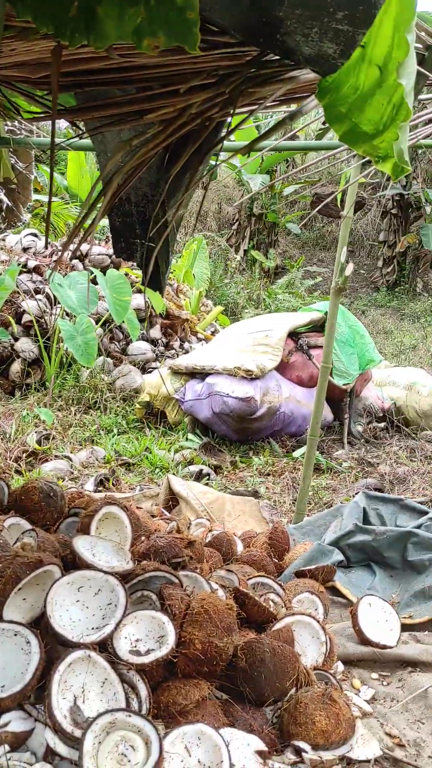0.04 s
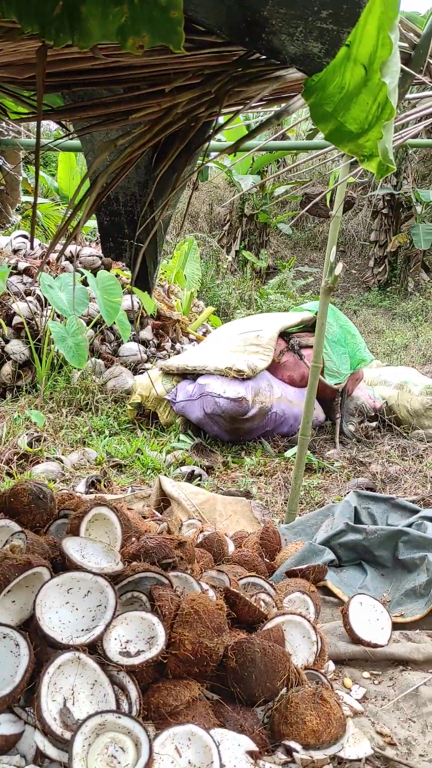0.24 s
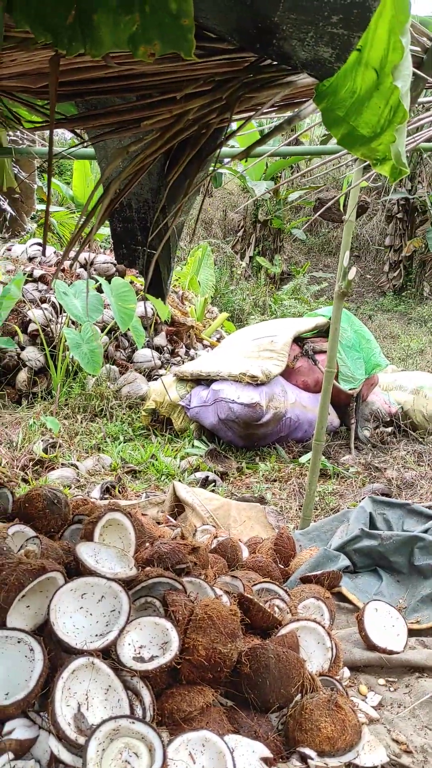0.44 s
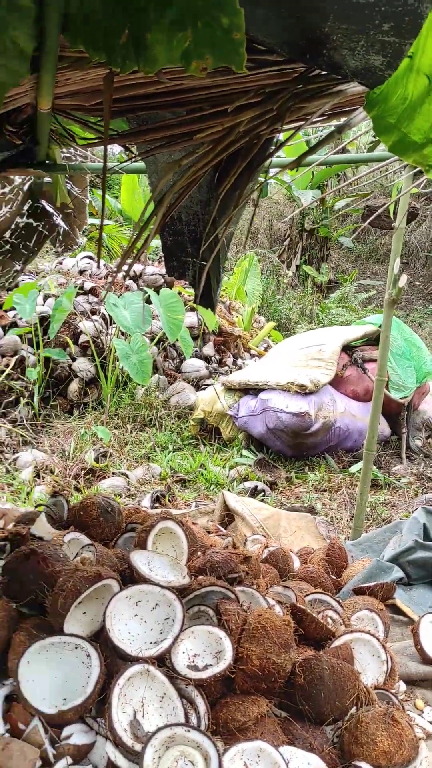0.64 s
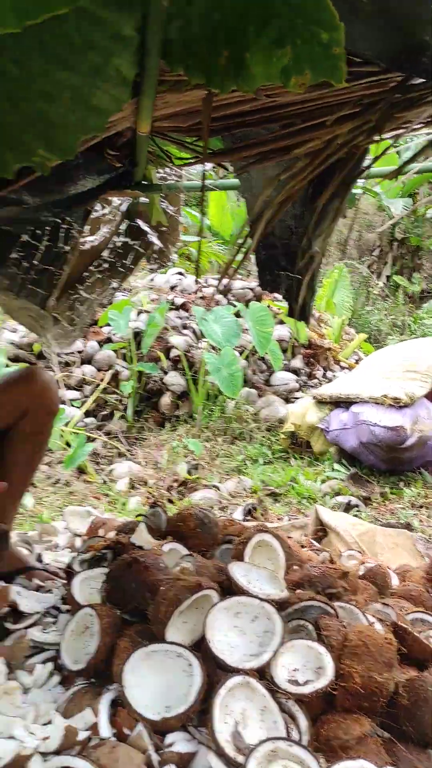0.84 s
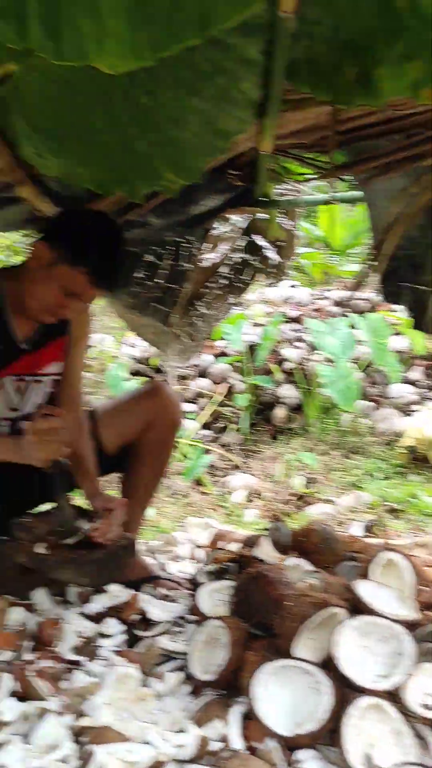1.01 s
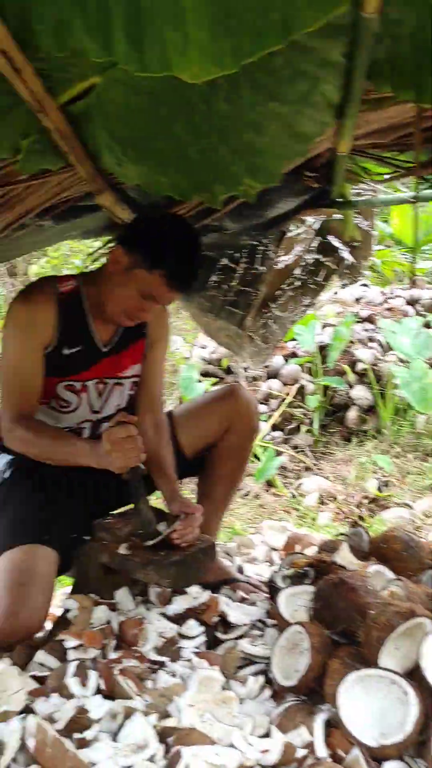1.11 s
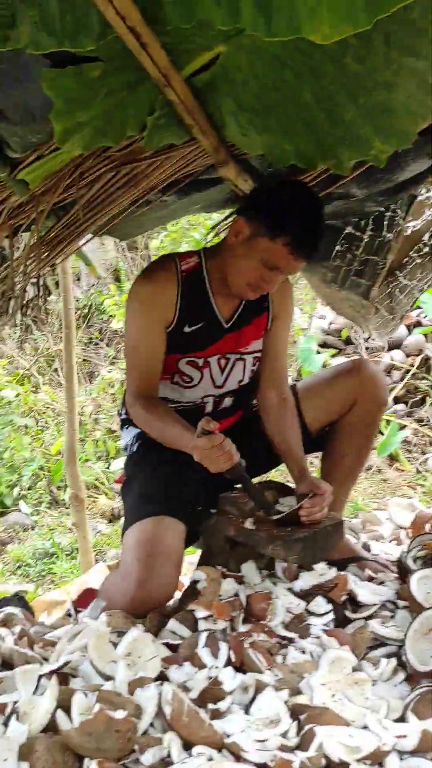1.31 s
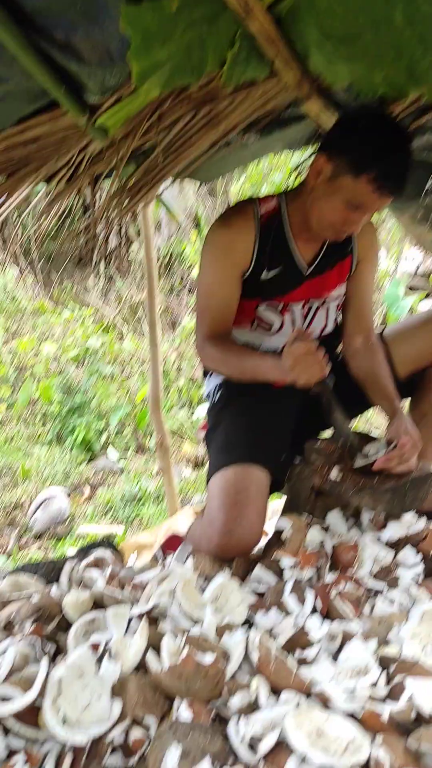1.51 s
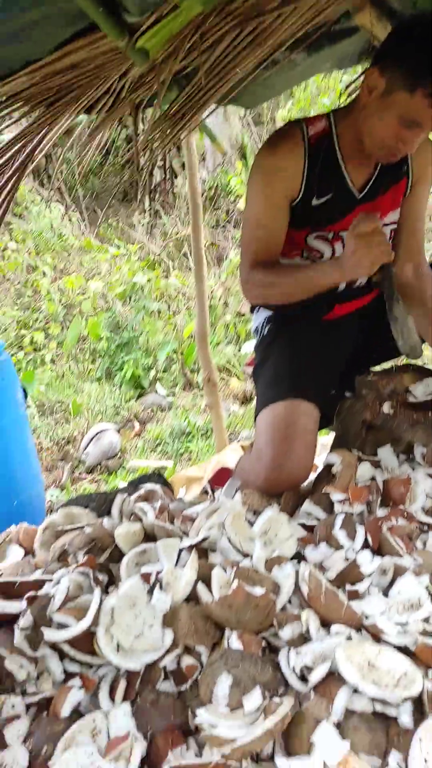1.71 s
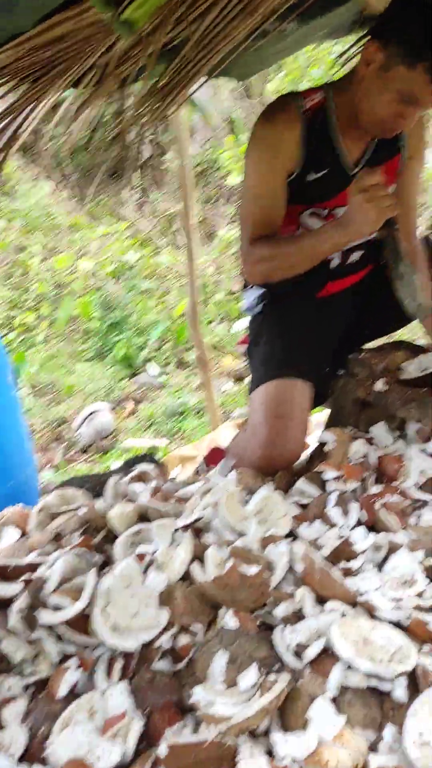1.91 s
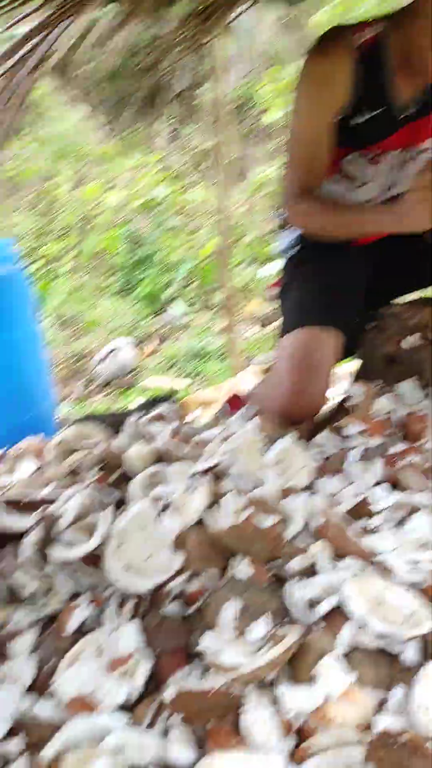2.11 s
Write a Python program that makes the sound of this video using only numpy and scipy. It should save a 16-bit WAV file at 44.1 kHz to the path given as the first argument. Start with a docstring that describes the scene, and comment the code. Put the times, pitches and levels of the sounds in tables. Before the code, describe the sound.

Coconut shell cracks under a large knife on a wooden block, loudly once and then again. After a short pause come smaller crackles, taps and blade scrapes, heard nearby outdoors over quiet hiss and slight wind.

```python
"""Under a leaf roof in a garden, a heavy knife knocks, cracks and scrapes coconut shells on a wooden block.
Each knock rings shell and block; each crack is a bright burst of splitting fibre. The blade grates
between them over quiet hiss and wind. Sound scatters off the heap of shells, and a phone with two
unlike, resonant microphone ports listens."""
import sys
import numpy as np
from scipy import signal
from scipy.fft import rfft, irfft, next_fast_len
from scipy.io import wavfile
from scipy.ndimage import uniform_filter1d

SR = 44100
rng = np.random.default_rng(int(sys.argv[2]) if len(sys.argv) > 2 else 0)


def output_pcm(signal):
    """Save a mono or channel-first signal as 16-bit PCM at the path in sys.argv[1].

    Samples are clipped to [-1, 1] before scaling.
    """
    pcm = np.clip(np.atleast_2d(signal).T, -1, 1) * 32767
    wavfile.write(sys.argv[1], SR, np.round(pcm).astype(np.int16))


N = 94815

# Shell modes. Each row: multiple of the piece's pitch, level in dB, t60 in seconds.
SHELL_MODES = [(.73, -7, 0.026), (1.01, 3.5, 0.022), (1.21, -5.5, 0.016), (1.45, -9, 0.02),
               (1.8, -4.5, 0.016), (2.15, -15, 0.025), (2.6, -14, 0.011), (3.7, -24.5, 0.01)]
# Block modes. Each row: frequency in Hz, level in dB, t60 in seconds.
BLOCK_MODES = [(74, -19, .05), (169, -15, 0.009), (248.2, -1.5, .045), (398.7, 2.5, 0.037),
               (487.3, 0, 0.045), (549, 0.5, 0.037)]
# Spectrum of splitting fibre. Each row: frequency in Hz, relative level in dB.
FIBRE_SPECTRUM = [(880, -35.5), (1500, -8.5), (2150, -9), (3500, -15.5), (4010, -10.5), (4390, -12.5),
                  (6110, -5), (7100, -4), (8500, -7.5), (9890, -19), (10700, -28.5), (15500, -30.5),
                  (16500, -44)]
SHELL_BLOOM_CYCLES, BLOCK_BLOOM_CYCLES = 1, 1.2


def knocks():
    """Blade on shell, shell on block; block modes far from the struck spot's pitch are weaker."""
    # Each row: start in seconds, shell peak in dB, shell pitch in Hz, thud relative to shell in dB,
    # pitch of the struck spot in Hz, ring length factor, shell overtone slope in dB per octave.
    blows = [(.067,-60,970,11,333,0.61,-3),(.104,-44,1430,-10,406,0.52,-1),(0.112,-38.5,1513,-28,369,1.3,-6),(0.137,-33.5,1370,-11,448,0.77,-1.5),
             (0.204,-32.5,1120,-10,560,0.39,-13),(0.2093,-6.5,1174,-5.5,565,0.49,-0.5),(0.2125,-10,828,-2.5,395,0.48,-17),
             (0.282,-58.5,1122,11,275,0.8,-5.5),(.3352,-34,1153,-17.5,600,0.84,-12),(0.3362,-36,1436,-22,596,0.74,-18.5),(0.428,-42,1260,-22,403,0.71,3),(0.4584,-15,1287,-20.5,473,0.44,-2),(.4608,-17,989,-13,520,0.57,2),(0.4629,-23.5,730,-2.5,515,0.3,-12),
             (.489,-31.5,1196,-4,448.4,0.66,-1),(0.949,-51.5,1137,-11,512,0.83,2.5),(1.0932,-21.5,1410,-12,257,0.57,5),(1.0989,-35.5,1330,8,240,0.21,-5),
             (1.1121,-17,1006,-17,310,0.56,7.5),(1.1202,-35,776,-15,303,0.56,-3),(1.1268,-23,870,-14.5,345,0.6,3.5),(1.1424,-27.5,1026,-30,301,0.89,1),(1.147,-29,809,-22,490,1.7,-4),
             (1.155,-29.5,893,-12.5,200,0.39,7),(1.257,-32,1406,-41,500,0.77,-3),(1.277,-32,870,-22,493,1.1,12),
             (1.316,-34,890,-35,496,1.9,6.5),(1.336,-28.5,835,-12,410,0.7,7),
             (1.376,-23.5,817,-8.5,384,0.83,-2.5),(1.386,-29.5,803,-8,225,0.52,-5),(1.401,-36.5,762,-20,396,2,-17),(1.439,-39,1244,-12.5,390,1.6,0.5),
             (1.481,-38.5,782,-11,229,1,7.5),(1.539,-34,814,-15,213,1.06,-8),(1.623,-40.5,830,3.5,313,0.48,-8),
             (1.645,-33,820,-4.5,284,0.44,2.5),(1.698,-52,1810,-1,202,0.35,-3),(1.764,-45.5,880,-6,75,0.82,-18)]
    out = np.zeros(N)
    for start_s, db, hz, thud_db, spot_hz, stretch, octave_db in blows:
        shell = ring(SHELL_MODES, SHELL_BLOOM_CYCLES, stretch, pitch=hz, focus_hz=hz, octave_db=octave_db)
        thud = ring(BLOCK_MODES, BLOCK_BLOOM_CYCLES, stretch, focus_hz=spot_hz, octave_db=-15)
        add(out, start_s, amp(db) * (shell + amp(thud_db) * thud))
    return out


def cracks():
    """Splitting fibre: fast-rising bright noise bursts, each with a resonant bite at its own pitch."""
    # Each row: start in seconds, level in dB before trim, rise in seconds, t60 in seconds,
    # relative bite level in dB, bite pitch in Hz.
    splits = [(0.107,-36,0.00062,0.068,-26,2800),(0.133,-33.5,0.0029,0.086,-10,2400),(0.2027,-21,0.0011,0.022,-21,2800),(0.205,-8.5,0.0023,0.052,-20.5,2200),
              (0.3595,-39.5,0.0028,0.04,-14,7000),(0.426,-39,0.0014,0.038,-12,3940),(0.4566,-17,0.0024,0.037,-4.5,4340),
              (0.5205,-36,0.003,0.025,-13,7050),(1.085,-23.5,0.0045,0.034,-16,2600),(1.0897,-18,0.0048,0.037,-7.5,2200),
              (1.1224,-33,0.0024,0.029,-4,2500),(1.1347,-21.5,0.0013,0.047,-18,1980),(1.1474,-41,0.0033,0.081,-6,2200),(1.26,-32.5,0.0029,0.09,-4,1360),
              (1.331,-40,0.00091,.025,0,4400),(1.3647,-25,0.00081,0.057,-7.5,6800),(1.379,-33,0.0026,0.052,-20,4430),(1.3934,-28.5,0.0019,0.021,-18,4500),(1.436,-40,0.0011,0.033,-18,2800),
              (1.527,-36.5,0.0042,0.07,-18,2740),(1.619,-32,.002,0.036,-29,2830),(1.6373,-34.5,0.0058,0.055,-1.5,2650),
              (1.6965,-32.5,0.00093,0.047,-25,2280),(1.7557,-31,0.0022,0.063,-6.5,4400)]
    trim_db, tilt_db_per_octave, bite_bandwidth_ratio = -6.5, 2.5, 0.3
    t, out = np.arange(5000) / SR, np.zeros((2, N))
    white = rng.standard_normal((3, N))
    noise = patchy(white[:2] + 0.28 * white[2])  # small part common to both ports
    wide = evened(colour(noise, lambda hz: amp(
        read(FIBRE_SPECTRUM, hz) + tilt_db_per_octave * np.log2(hz + 1))))
    for start_s, db, rise_s, t60_s, bite_db, bite_hz in splits:
        span = slice(round(start_s * SR), round(start_s * SR) + len(t))
        attack = np.minimum(t / rise_s, 1) ** 2
        decay = amp(db + trim_db - 60 * np.maximum(t - rise_s, 0) / t60_s)
        resonator = signal.iirpeak(bite_hz, 1 / bite_bandwidth_ratio, SR)
        bite = evened(signal.lfilter(*resonator, signal.lfilter(*resonator, noise[:, span])))
        add(out, start_s, attack * decay * (wide[:, span] + amp(bite_db) * bite))
    return out


def high_ring():
    """A brief high ring near 7 and 9 kHz on the hardest blow."""
    # Each row: frequency in Hz, level in dB, t60 in seconds.
    high_ring_modes = [(5720, -22, 0.023), (6940, 4, .03), (7300, -1.5, 0.024), (8650, -0.5, 0.011),
                       (9180, -4.5, 0.018)]
    out = np.zeros(N)
    add(out, start_s=0.2068, sound=amp(-13) * ring(high_ring_modes, bloom_cycles=2))
    return out


def grating():
    """Dense tiny slips of the blade: a fibre hiss, and a rumble where they ring shell and block."""
    # Each row: time in seconds, hiss level in dB, rumble level in dB.
    levels = [(0, -58, -80), (.09, -60, -61), (.12, -50, -75), (.17, -55.5, -83), (.2, -89, -86),
              (.3, -63, -62), (.42, -57.5, -72.5), (.48, -43.5, -52), (.56, -58, -62), (.6, -69, -71.5),
              (1.07, -70.5, -96.5), (1.1, -42.5, -38.5), (1.16, -41.5, -43.5), (1.185, -76, -75),
              (1.22, -52.5, -53), (1.26, -41.5, -54), (1.35, -42, -43.5), (1.4, -40.5, -42),
              (1.425, -58, -62), (1.5, -52.5, -61.5), (1.66, -53, -59), (1.74, -52, -63.5),
              (1.8, -62, -65.5), (1.89, -57.5, -65), (1.94, -52.5, -58.5), (2.03, -50, -60.5),
              (2.09, -54, -61.5), (2.15, -57, -66.5)]
    slips_per_s = 1800
    slips = rng.choice([-1., 1.], (3, N)) * (rng.random((3, N)) < slips_per_s / SR)
    hiss = evened(colour(patchy(slips[:2]), lambda hz: amp(read(FIBRE_SPECTRUM, hz) - 60 * (hz < 1200))))
    low, high = (ring(SHELL_MODES, SHELL_BLOOM_CYCLES, stretch=0.45, pitch=hz) for hz in (880, 1200))
    block = ring(BLOCK_MODES, BLOCK_BLOOM_CYCLES, stretch=0.23)
    body = low + amp(1) * high + amp(0.5) * block
    rumble = evened(signal.oaconvolve(slips[2], body)[:N])
    return amp(curve(levels, column=1)) * hiss, amp(curve(levels, column=2)) * rumble


def scatter(x, t60_s):
    """Echoes off the heap of shells: sparse decaying taps of random sign, separate for each port."""
    echo_db, gap_s, tap_chance = -12.5, 0.002, 0.06
    t = np.arange(8000) / SR
    taps = rng.choice([-1., 1.], (2, len(t))) * (rng.random((2, len(t))) < tap_chance)
    taps *= (t > gap_s) * amp(-60 * t / t60_s)
    taps /= np.linalg.norm(taps, axis=1, keepdims=True)
    return amp(echo_db) * signal.oaconvolve(x * np.ones((2, 1)), taps, axes=1)[:, :N]


def background_hiss():
    """Steady, slightly patchy hiss, with the microphone ports' resonances near 6.7 and 8.7 kHz."""
    # Each row: frequency in Hz, relative level in dB.
    hiss_spectrum = [(20, 7), (60, -24.5), (170, -8), (450, -12), (750, -17), (1900, -20.5), (5800, -22),
                     (6700, -5), (7400, -18.5), (8700, -14.5), (10000, -32), (11300, -19), (12000, -58),
                     (16500, -60.5)]
    # Each row: frequency in Hz, left-right correlation.
    correlation = [(60, .3), (900, .35), (2500, .05)]
    level_db, patch_db = -58, 1.3
    frames, hz = N // 256 + 5, np.fft.rfftfreq(1024, 1 / SR)
    left_re, left_im, own_re, own_im, patches = rng.standard_normal((frames, 513, 5)).T
    patches = evened(uniform_filter1d(uniform_filter1d(patches, 12, axis=0), 10, axis=1))
    shared = read(correlation, hz)[:, None]
    left = left_re + 1j * left_im
    right = shared * left + np.sqrt(1 - shared ** 2) * (own_re + 1j * own_im)
    spectra = np.array([left, right]) * amp(read(hiss_spectrum, hz)[:, None] + patch_db * patches)
    return amp(level_db) * evened(signal.istft(spectra, nperseg=1024, noverlap=768)[1][:, :N])


def wind():
    """Low, lumpy gusts, unrelated at the two ports."""
    # Each row: time in seconds, level in dB.
    levels = [(0, -63), (.3, -67.5), (.58, -66), (.72, -67.5), (.9, -79.5), (1.07, -71.5), (1.38, -71),
              (1.74, -63), (1.765, -50.5), (1.8, -70), (1.93, -58), (2.15, -67)]
    gusts = evened(colour(rng.standard_normal((2, N)), lambda hz: hz / (hz + 15) / (1 + (hz / 60) ** 2)))
    return amp(curve(levels, column=1)) * gusts


def ring(modes, bloom_cycles, stretch=1, pitch=1, focus_hz=None, octave_db=0):
    """Decaying sines that swell over bloom_cycles, weighted by octaves from focus_hz; unit peak."""
    grip_exponent = 1.43  # the gripping hand bends each decay: slow, then fast
    t, out = np.arange(5000) / SR, 0
    for base, db, t60_s in modes:
        hz = base * pitch
        slope_db = octave_db * abs(np.log2(hz / focus_hz)) if focus_hz else 0
        decay_db = 60 * (t / (t60_s * stretch)) ** grip_exponent
        swell = 1 - np.exp(-t * hz / bloom_cycles)
        out = out + swell * amp(db + slope_db - decay_db) * np.sin(2 * np.pi * hz * t)
    return out / abs(out).max()


def patchy(x, depth_db=2.5):
    """Fibres sound in short random patches of pitch and time."""
    spectra = signal.stft(x, nperseg=256, noverlap=192)[2]
    patches = rng.standard_normal(spectra.shape[:0:-1]).T
    patches = evened(uniform_filter1d(uniform_filter1d(patches, 4, axis=0), 5, axis=1))
    return signal.istft(spectra * amp(depth_db * patches), nperseg=256, noverlap=192)[1][:, :N]


def amp(db):
    return 10 ** (np.asarray(db) / 20)


def evened(x):
    """Scales to unit RMS."""
    return x / np.sqrt(np.mean(x ** 2) + 1e-20)


def read(points, hz):
    """Interpolates over log frequency."""
    points_hz, values = np.transpose(points)
    return np.interp(np.log(hz + 1), np.log(points_hz + 1), values)


def curve(table, column):
    """Interpolates a column over time."""
    rows = np.array(table)
    return np.interp(np.arange(N) / SR, rows[:, 0], rows[:, column])


def add(mix, start_s, sound):
    part = mix[..., round(start_s * SR):][..., :sound.shape[-1]]
    part += sound[..., :part.shape[-1]]


def colour(x, gain):
    """Filters by gain(hz)."""
    size = next_fast_len(N + 4096)
    return irfft(rfft(x, size) * gain(np.fft.rfftfreq(size, 1 / SR)), size)[..., :N]


def scene():
    """Dull and bright sounds, their echoes, hiss and wind."""
    fibre_hiss, rumble = grating()
    dull = knocks() + rumble
    bright = cracks() + high_ring()
    echoes = scatter(dull, t60_s=0.077) + scatter(bright, t60_s=0.082)
    return dull + bright + fibre_hiss + echoes + background_hiss() + wind()


def record(dry):
    """Each port favours its own bands and has its own phase; a low-pass follows."""
    # Each row: frequency in Hz, left minus right level in dB.
    balance = [(60, 6.5), (600, 5), (1500, 6), (2500, -1.5), (6000, -4.5), (7000, -12), (8000, 1.5),
               (9000, 7), (11000, 0)]
    # Each row: frequency in Hz, phase lead of the left port in radians.
    left_lead = [(350, -0.53), (500, -1.4), (700, 1), (1200, 0.72), (3000, 0.93)]
    side, cutoff_hz = np.array([[-1.], [1.]]), 16500

    def port_response(hz):
        gain = np.sqrt(2 / (1 + amp(2 * side * read(balance, hz))))
        return gain * np.exp(-0.5j * side * read(left_lead, hz))

    lowpass = signal.firwin(511, cutoff_hz, window=("kaiser", 9), fs=SR)
    return signal.oaconvolve(colour(dry, port_response), lowpass[None], "same")


dry = scene()
out = record(dry)
output_pcm(out)
```